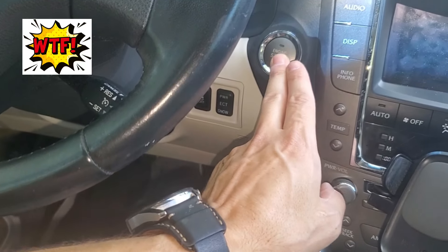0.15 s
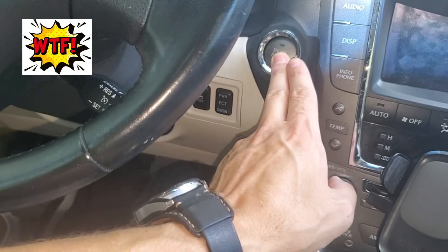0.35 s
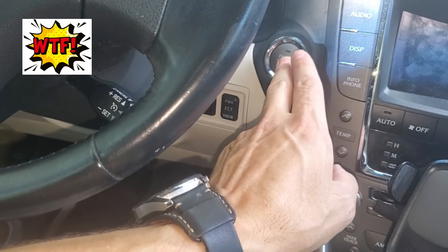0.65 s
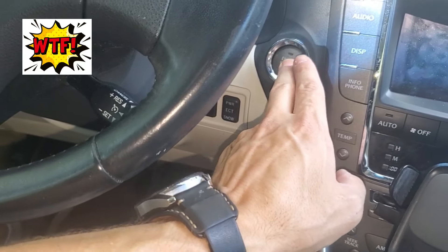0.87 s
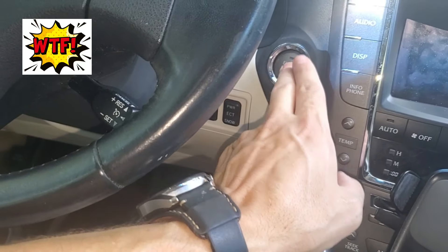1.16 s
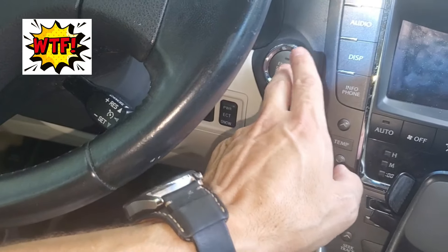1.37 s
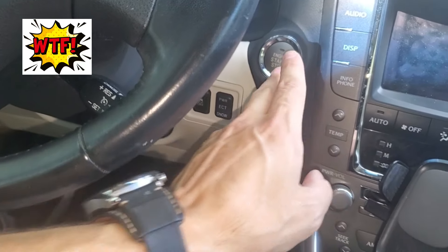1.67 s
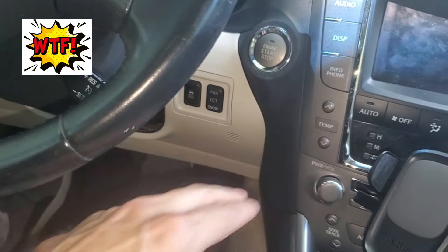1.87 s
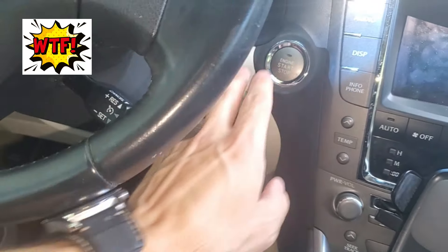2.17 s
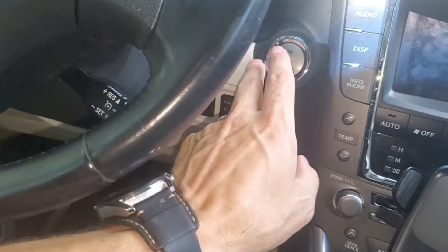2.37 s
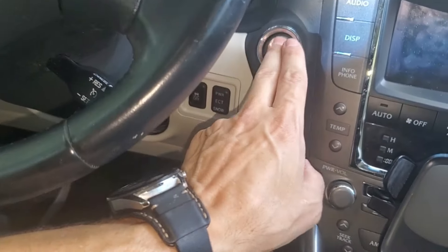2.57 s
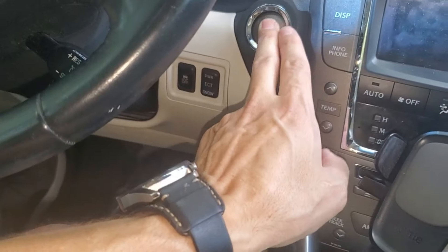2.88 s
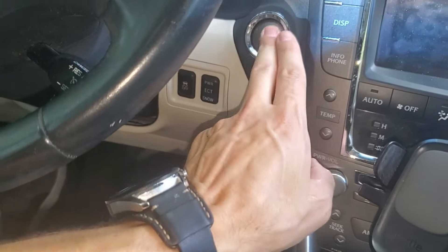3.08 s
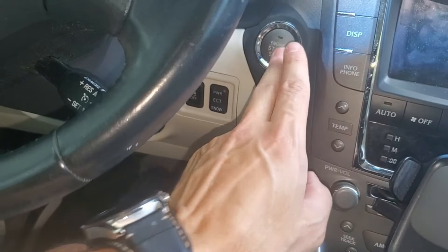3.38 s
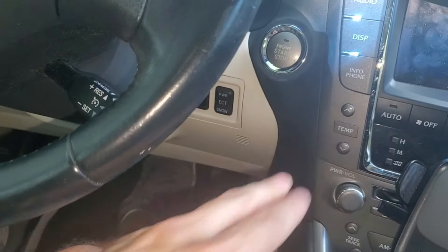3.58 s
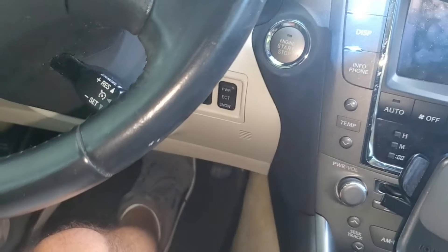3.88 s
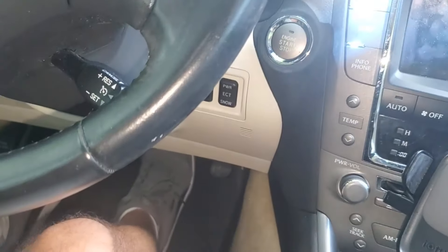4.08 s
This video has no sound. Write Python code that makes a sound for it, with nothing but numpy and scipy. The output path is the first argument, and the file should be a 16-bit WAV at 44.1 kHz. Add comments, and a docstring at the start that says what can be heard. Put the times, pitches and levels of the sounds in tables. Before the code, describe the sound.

A close stereo microphone in a small, padded car cabin picks up a loose push button slightly to the right. Crisp metallic clicks and hollow panel knocks come in an irregular run, stop briefly, then return faster and weightier, with dull relays behind the dashboard. The hand withdraws with a very faint rustle and tiny thin squeaks, leaving a few muffled clunks over low rumble and slight hiss.

```python
"""Fingers jab a start button again and again inside a parked car, just right of the microphone.
Each switch click is a bright metal snap (noise bursts through spring resonances), then a plastic
knock that rings the dashboard. Relays clunk dully behind the panel; the loose button ticks.
The hand swishes and rustles, and two thin squeaks are gliding tones.
Under it all lie a wavering low hum, cabin rumble and a faint hiss."""
import sys
import numpy as np
from scipy import signal
from scipy.fft import rfft, irfft
from scipy.io import wavfile

SR = 44100
rng = np.random.default_rng(int(sys.argv[2]) if len(sys.argv) > 2 else 0)


def to_wav(sig):
    """Store sig (one row per channel, or 1-D mono) as 16-bit WAV at the path in sys.argv[1].

    Samples outside -1..1 are clipped; the rate is SR.
    """
    pcm = np.clip(np.atleast_2d(sig), -1, 1) * 32767
    pcm = np.round(pcm).astype(np.int16)
    wavfile.write(sys.argv[1], SR, pcm.T)  # frames by channels


N = 186972  # length of the scene in samples
TIME = np.arange(N) / SR  # seconds
AGE = TIME[:SR // 2]  # seconds since a short sound began

# Clicks of the switch, going in or coming out. Each row: start in seconds, relative snap level in dB,
# ping in dB against the snap, crack in dB against the snap, plunger travel in ms,
# relative knock level in dB.
CLICKS = [(0.001, -58.5, -14, -9, 6.5, -51.5), (0.377, -45.5, -12, -12.5, 1.9, -66),
          (0.619, -37, -9.5, -9.5, 1.96, -67), (0.824, -39.5, -12.5, -13, 12, -43.5),
          (1.001, -39, -5.5, -13, 7.9, -49.5), (1.1762, -40, -11, -15.5, 11, -45),
          (1.3619, -43.5, -14, -13, 4.1, -45), (1.4715, -32.5, -15, -22.5, 10, -37.5),
          (1.6757, -54.5, -15, -12, 4.85, -46.5), (1.71, -59.5, 16.5, -4, 6.1, -58.5),
          (2.6109, -37, -4, -24, 8, -48.5), (2.7689, -53.5, 1.5, -11.5, 4.76, -52),
          (2.8691, -36, -8.5, -10.5, 8, -47.5), (3.0062, -46, -4, -11, 3.92, -49.5),
          (3.042, -43.5, -1, -8, 9, -56), (3.091, -33, -9.5, -4.5, 3.6, -33.5),
          (3.2141, -37, 4, -6.5, 2.53, -51), (3.2793, -26, -7.5, -14, 7, -34.5),
          (3.4251, -50, -19, -14, 4.05, -61), (3.451, -48.5, 4.5, -10, 2.2, -52)]
# Upper resonances of the switch spring. Each row: frequency in Hz, width in Hz, relative level in dB.
SPRING_UPPER = [(11080, 670, -0.27), (11910, 460, -1.3)]
# Top resonances of the switch spring. Each row: frequency in Hz, width in Hz, relative level in dB.
SPRING_TOP = [(13040, 3500, -0.7), (14550, 2600, -1.4)]

# A harder knock gains more clack than body: the thud grows by this many dB for each dB of knock.
TYPICAL_KNOCK_DB, THUD_SLOPE = -49, 0.55 - 0.01
# After a pause the hand jabs with more weight, and each click from this second on also trips a relay.
JABS_FROM_S = 2.4


def undb(db):
    """Turn decibels into a gain."""
    return 10 ** (np.asarray(db) / 20)


def unit(x):
    """Scale to a total energy of 1, averaged over the channels."""
    energy = np.sum(x ** 2, axis=-1)
    return x / np.sqrt(np.mean(energy))


def fade(t60):
    """A decay that loses 60 dB in t60 seconds."""
    return np.exp(-np.log(1000) * AGE / t60)


def noise(size, width):
    """Stereo noise; width 0 is the same in both ears, 1 is unrelated."""
    mid, side = rng.standard_normal((2, size))
    return (mid + width * np.array([side, -side])) / np.hypot(1, width)


def pan(x, right_db):
    """Place a sound to the right by a level difference between the ears."""
    return x * undb([[-right_db / 2], [right_db / 2]])


def add(track, s, sound):
    """Mix a short sound into a track at second s."""
    start = max(int(s * SR), 0)
    track[:, start:start + sound.shape[-1]] += sound[..., :N - start]


def cut(x, hz, kind, order=2):
    """Keep only what lies below ("low") or above ("high") a frequency."""
    return signal.sosfilt(signal.butter(order, hz, kind, fs=SR, output="sos"), x)


def ring(force, modes, order=1):
    """Drive a set of resonances; neighbours swing in opposite directions."""
    out = 0
    for k, (hz, width, db) in enumerate(modes):
        edges = np.clip([hz - width / 2, hz + width / 2], 10, SR / 2 - 100)
        resonance = signal.butter(order, edges, "band", fs=SR, output="sos")
        out = out + (-1) ** k * undb(db) * signal.sosfilt(resonance, force)
    return out


def wander(hz):
    """Slow chance with spread 1 and little faster than hz."""
    x = cut(rng.standard_normal(N + SR), hz, "low")[SR:]  # the filter settles in the dropped second
    return x / x.std()


def follow(curve, axis=1):
    """Gain along one dB column of a curve whose rows start with a time."""
    columns = np.transpose(curve)
    return undb(np.interp(TIME, columns[0], columns[axis]))


def bump(middle_s, half_length_s):
    """A smooth swell and fade around a moment."""
    return np.exp(-((TIME - middle_s) / half_length_s) ** 2)


def wash(points, width):
    """Steady noise of rms 1, shaped to the given spectrum."""
    hz, db = np.transpose(points)
    bins_hz = np.arange(N // 2 + 1) * SR / N
    gain = undb(np.interp(np.log(bins_hz + 1), np.log(hz), db))
    x = irfft(rfft(noise(N, width)) * gain, N)
    return x / x.std()


def background():
    """A wavering low hum in cabin rumble, under a faint hiss whose treble swells on its own."""
    # Spectra of the rumble and the hiss. Each row: frequency in Hz, relative level in dB per Hz.
    rumble_spectrum = [(22, -20), (35, 11.5), (55, 7.5), (80, 5), (110, -1), (170, -10.5), (260, -16.5),
                       (500, -68)]
    hiss_spectrum = [(150, 8), (400, 3.5), (650, 3), (1000, -5), (1600, -4.5), (2200, -12), (3000, -8),
                     (4500, -17), (6500, -22.5), (7700, -24.5), (9300, -12.5), (11000, -13.5), (13000, -14),
                     (16000, -15.5)]
    # Rise and fall of the rumble. Each row: time in seconds, relative level in dB.
    rumble_level = [(0.05, -47), (0.08, -44), (0.17, -50.5), (1.64, -45.5), (1.65, -53.5), (2.73, -47.5),
                    (3.37, -46), (4.15, -54)]
    # Rise and fall of the hum. Each row: time in seconds, relative level in dB.
    hum_level = [(0.05, -55), (0.11, -46), (0.14, -51), (0.94, -55), (1.76, -43.5), (1.81, -59),
                 (2.25, -44.5), (2.33, -65), (2.45, -37.5), (2.56, -57.5), (2.74, -36.5), (2.78, -55),
                 (3.0, -43.5), (4.15, -64.5)]
    # Rise and fall of the hiss. Each row: time in seconds, relative body level in dB,
    # relative treble level in dB.
    hiss_level = [(0.1, -69.5, -82), (0.34, -72.5, -82.5), (1.42, -69, -79.5), (1.92, -73.5, -81.5),
                  (2.56, -71, -78.5), (2.98, -67.5, -76.5), (3.2, -68, -73), (3.58, -69.5, -84),
                  (4.15, -72.5, -76)]

    rumble = undb(3) * follow(rumble_level) * wash(rumble_spectrum, width=.3)

    hum_hz, drift_hz = 70.3, 1.2
    phase = 2 * np.pi * np.cumsum(hum_hz + drift_hz * wander(hz=6.6)) / SR
    waver = undb(4 * wander(hz=6.6))
    hum = undb(-1) * follow(hum_level) * waver * np.sqrt(2) * np.sin(phase)

    air = wash(hiss_spectrum, width=0.95)
    split_hz = 7700
    body, treble = cut(air, split_hz, "low", order=5), cut(air, split_hz, "high", order=5)
    body = undb(7.0) * follow(hiss_level) * body / body.std()
    treble = undb(5.5) * follow(hiss_level, axis=2) * treble / treble.std()
    return rumble + hum + pan(body, right_db=-3.1) + pan(treble, right_db=1)


def snap(scatter_db, scatter_t60):
    """One contact: a sharp impact, brief chatter, then dense reflections from the nearby trim."""
    direct = unit(noise(len(AGE), .9) * fade(.009))
    direct[:, SR // 3000] += .5  # the impact, a third of a millisecond in
    scatter = undb(scatter_db) * unit(noise(len(AGE), 0.76) * fade(scatter_t60))
    # the button is on the right and shadowed from the left
    return pan(direct + scatter, right_db=14.5)


def spring():
    """The switch spring flips: main modes ring, upper modes ping, broad outer modes crack."""
    # Low and main resonances of the spring. Each row: frequency in Hz, width in Hz, relative level in dB.
    spring_low = [(4750, 5000, -22), (6364, 1040, 2)]
    spring_main = [(9130, 1600, -9.5), (9330, 540, 1.5), (10030, 890, -1)]

    main, upper, low, top = np.zeros((4, 2, N))
    for s, db, ping_db, crack_db, _, _ in CLICKS:
        shares_db = (21, ping_db + 25, crack_db + 25, crack_db + 23)
        for force, share_db in zip((main, upper, low, top), shares_db):
            # every family of modes gets its own random snap
            add(force, s, undb(db + share_db) * snap(scatter_db=3.5, scatter_t60=0.062))

    out = 0
    families = [(main, spring_main), (upper, SPRING_UPPER), (low, spring_low), (top, SPRING_TOP)]
    for force, modes in families:
        bare_snap = undb(-28.5) * cut(force, 2200, "high")
        out = out + ring(force, modes, order=2) + bare_snap
    return out


def stroke(travel, rub_db, rub_t60, width):
    """The plunger rubs ever harder for travel seconds, hits its stop and rattles out."""
    # rubbing starts at 0.43 of its full force
    rise = np.interp(AGE, [0, travel], [0.43, 1])
    decay = np.exp(-np.log(1000) * np.maximum(AGE - travel, 0) / rub_t60)
    # the rattle is a string of small uneven contacts, about half a millisecond each
    contacts = np.repeat(rng.standard_normal(len(AGE)), SR // 2000)[:len(AGE)]
    grain = undb(2.47 * contacts)
    force = undb(rub_db) * unit(noise(len(AGE), width) * rise * decay * grain)
    force[:, int(travel * SR)] += 1  # the stop
    return unit(force)


def dashboard():
    """The plunger's knock rings the panel: low modes take the blow, high ones the rattle."""
    # Three families of panel resonances. Each row: frequency in Hz, width in Hz, relative level in dB.
    dash_low = [(112, 30, 2), (172, 45, -1), (245, 55, -5), (308, 45, 1), (355, 60, -1), (479, 60, 1)]
    dash_mid = [(622, 33, -5.5), (725, 53, 1), (795, 142, -1.5), (1053, 117, -6)]
    dash_high = [(1169, 56, -0.5), (1482, 166, 1.5), (1640, 216, -0.5), (1878, 130, -4), (2325, 270, -8.5),
                 (3180, 640, -7.5), (3400, 520, -7), (4600, 1530, -16)]
    # Soft touches, mostly fingertips landing just before a press.
    # Each row: start in seconds, relative level in dB.
    soft_touches = [(0.605, -58), (1.451, -54), (2.569, -60), (2.838, -65), (3.076, -46), (3.258, -54.5),
                    (4.222, -57.5)]

    low, mid, high = np.zeros((3, 2, N))
    low_width, high_width = .35, .85  # stereo width of the forces
    clop_slope = 0.55  # dB of middle clop for each dB of knock
    for s, _, _, _, travel_ms, knock_db in CLICKS:
        travel = travel_ms / 1000
        force_db = knock_db - TYPICAL_KNOCK_DB
        # the later, weightier jabs thud 5 dB more
        thud_db = THUD_SLOPE * force_db + 5 * (s > JABS_FROM_S)
        clop_db = clop_slope * force_db
        add(low, s, undb(thud_db + 3.5) * stroke(travel, rub_db=3.5, rub_t60=0.12, width=low_width))
        add(mid, s, undb(clop_db - 0.5) * stroke(travel, rub_db=7.5, rub_t60=0.11, width=high_width))
        add(high, s, undb(force_db - 7.0) * stroke(travel, rub_db=32, rub_t60=0.068, width=high_width))

    for s, db in soft_touches:
        touch = stroke(0.0039, rub_db=5, rub_t60=0.084, width=high_width)
        # a soft fingertip is duller than the plunger
        pat = undb(db + 40.5) * cut(touch, 3100, "low")
        add(high, s, pat)
        add(mid, s, undb(5) * pat)

    # the finger cushions the blow, so the thud is dull
    thud = ring(cut(low, hz=440, kind="low"), dash_low)
    clop = ring(mid, dash_mid)
    clack = cut(ring(high, dash_high), 5900, "low")
    return pan(thud, right_db=3.0) + pan(clop, right_db=2.5) + pan(clack, right_db=5.5)


def relays():
    """Armatures close behind the panel, alone or tripped by a jab; only the low clunk gets through."""
    # Relays that close alone. Each row: start in seconds, relative level in dB.
    lone_relays = [(2.151, -42), (3.43, -40), (3.519, -42), (3.841, -49.5), (3.89, -41), (4.218, -44.5)]
    # Resonances of the relay box. Each row: frequency in Hz, width in Hz, relative level in dB.
    relay_box = [(150, 70, -5), (270, 60, -3), (320, 55, 0), (490, 160, -14)]

    tripped = []
    for s, *_, knock_db in CLICKS:
        if s > JABS_FROM_S:
            tripped.append((s, -40.5 + THUD_SLOPE * (knock_db - TYPICAL_KNOCK_DB)))

    force = np.zeros((2, N))
    for s, db in list(lone_relays) + tripped:
        closing = stroke(.002, rub_db=-3, rub_t60=.05, width=.3)
        add(force, s, undb(db + 50.5) * closing)
    clunk = cut(ring(force, relay_box), hz=470, kind="low")
    return pan(cut(clunk, hz=189, kind="high"), right_db=3)


def ticks():
    """The loose button shifts in its bezel: tiny snaps ring the spring's upper and top modes."""
    # Light ticks. Each row: start in seconds, relative level in dB.
    light_ticks = [(2.154, -57.5), (2.5176, -56)]
    force = np.zeros((2, N))
    for s, db in light_ticks:
        add(force, s, undb(db + 20.5) * snap(scatter_db=1.0, scatter_t60=0.19))
    return ring(force, list(SPRING_UPPER) + list(SPRING_TOP))


def brush():
    """Banded noise: a soft swish as the hand comes back, a rustle of the sleeve as it withdraws."""
    # bands: frequency in Hz, width in Hz, relative level in dB
    hiss = ring(noise(N, 0.87), [(3130, 1350, 0.0), (6040, 1800, 1.0), (10300, 2100, -0.5)], order=2)
    swish = undb(-69.5) * hiss / hiss.std() * bump(middle_s=2.285, half_length_s=.055)
    cloth = ring(noise(N, 0.99), [(2600, 1700, 0), (11700, 4100, 0)], order=2)
    rustle = undb(-70) * cloth / cloth.std() * bump(middle_s=3.83, half_length_s=0.15)
    return pan(swish + rustle, right_db=11.5)


def squeak():
    """Faint thin tones that rise and fall in pitch as they swell and fade."""
    # Each row: time of the highest pitch in seconds, highest pitch in Hz before jitter, relative level in dB.
    thin_squeaks = [(3.62, 11300, -72), (3.805, 11150, -70.5)]
    rise_hz = 850
    overtone_ratio, overtone_db = 1.235, -15
    out = 0
    for s, top_hz, db in thin_squeaks:
        hz = top_hz - rise_hz * (1 - bump(s, half_length_s=.052))
        jitter_hz = 60 * wander(hz=149)
        phase = 2 * np.pi * np.cumsum(hz + jitter_hz) / SR
        # the level flutters as well
        level = undb(db + 6.3 * wander(hz=151)) * bump(s, half_length_s=.04)
        tone = np.sin(phase) + undb(overtone_db) * np.sin(overtone_ratio * phase)
        out = out + level * tone
    return pan(out, right_db=13)


def scene():
    """All sources, with the faint late ring of the cabin, whose soft seats take away the treble."""
    near = spring() + dashboard() + relays() + ticks()
    cabin = unit(noise(len(AGE), 0.85) * fade(t60=0.22))
    late = signal.fftconvolve(near.mean(axis=0)[None], cabin, axes=1)[:, :N]
    late = cut(late, hz=9000, kind="low", order=1)
    late = cut(late, hz=507, kind="high", order=1)
    return near + undb(-13.5) * late + background() + brush() + squeak()


def record(dry):
    """The microphone drops the deepest bass and the very top."""
    without_bass = cut(dry, 27, "high")
    steep_top = signal.ellip(8, .2, 70, 15900, fs=SR, output="sos")  # low-pass at 15900 Hz
    return signal.sosfilt(steep_top, without_bass)


dry = scene()
out = record(dry)
to_wav(out)
```